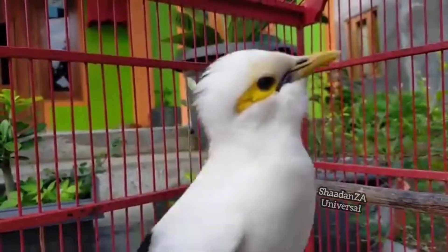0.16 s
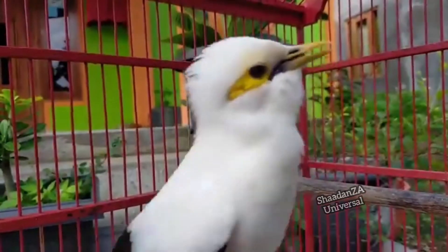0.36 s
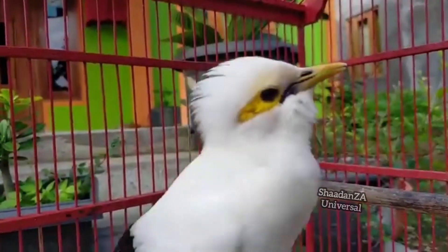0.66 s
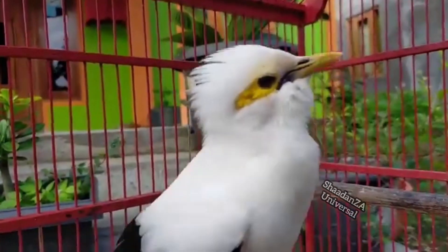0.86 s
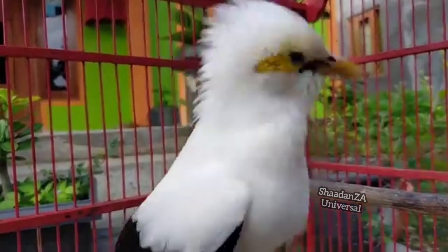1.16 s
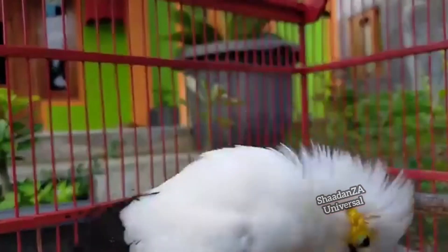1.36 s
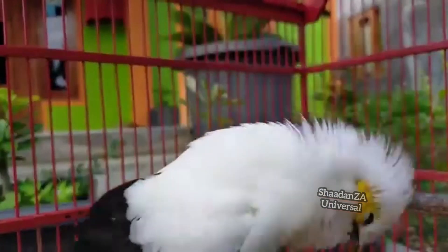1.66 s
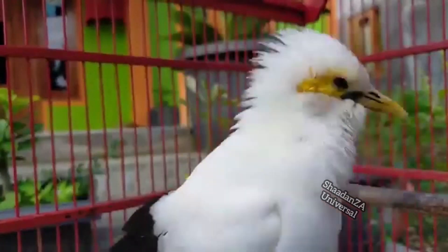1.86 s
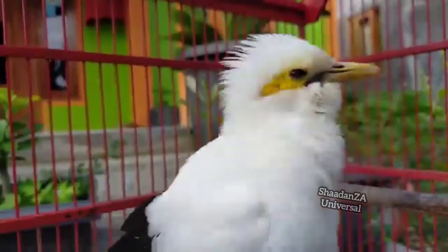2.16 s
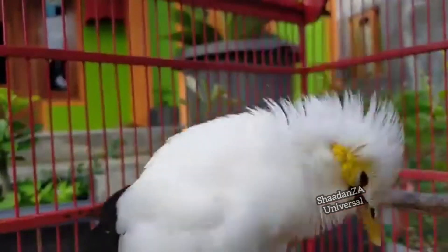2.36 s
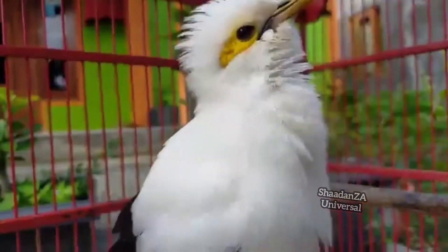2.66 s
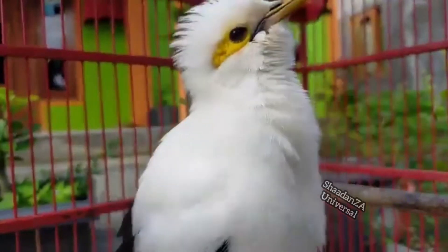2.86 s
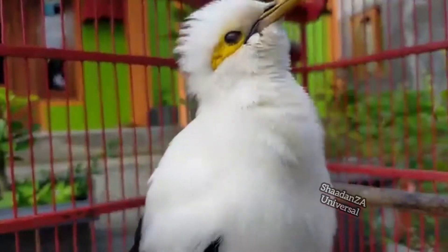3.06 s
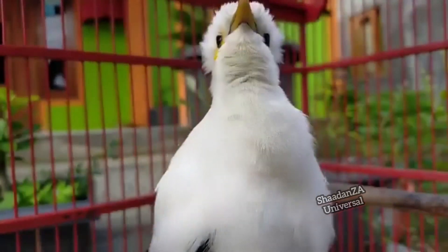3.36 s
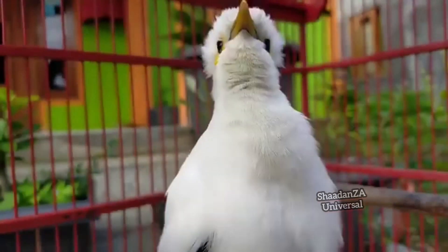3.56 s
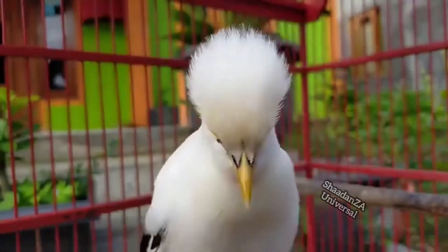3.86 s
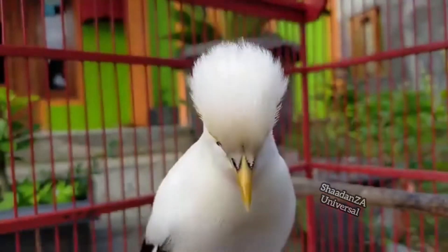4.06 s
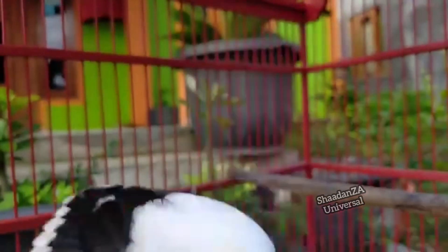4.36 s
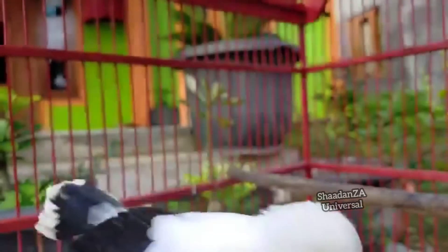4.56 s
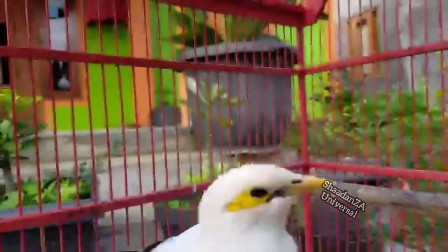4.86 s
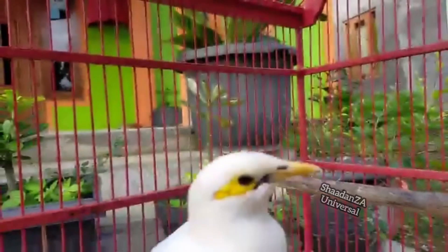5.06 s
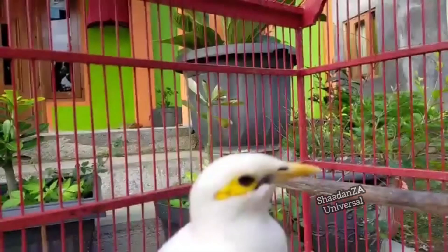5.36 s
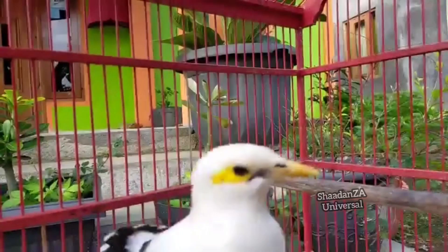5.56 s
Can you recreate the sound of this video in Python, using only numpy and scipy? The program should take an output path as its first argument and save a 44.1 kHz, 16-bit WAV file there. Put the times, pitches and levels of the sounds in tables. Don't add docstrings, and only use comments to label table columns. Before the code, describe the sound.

Very close and nearly dry, a caged bird whistles a level note and a falling one, knocks its wooden perch, then rasps four times with small snaps and four times louder. Farther off another bird chirps in two runs, blurred by yard walls. A motorbike approaches throughout, ending loudest under a soft rising whistle. Light wind buffets the phone microphone.

```python
import sys
import numpy as np
from scipy import signal
from scipy.fft import rfft, irfft, next_fast_len
from scipy.io import wavfile
from scipy.ndimage import map_coordinates

SR = 44100
rng = np.random.default_rng(int(sys.argv[2]) if len(sys.argv) > 2 else 0)


def to_wav(sig):
    pcm = np.clip(np.atleast_2d(sig), -1, 1) * 32767
    pcm = np.round(pcm).astype(np.int16)
    wavfile.write(sys.argv[1], SR, pcm.T)


def gain_from_decibels(decibels):
    exponent = np.asarray(decibels, float) / 20
    return 10 ** exponent


N = 251370
TIME = np.arange(N) / SR

# time_s, pitch_hz, level_db, octave_db (overtone from the open beak)
WHISTLES = [
    [(0.0, 1957, -18.5, -58), (0.032, 1929, -15.5, -46.5), (0.076, 1967, -18, -55.5),
     (0.102, 1934, -14.5, -47.5), (0.156, 1915, -22.5, -55), (0.17, 1970, -53.5, -81)],
    [(0.375, 2007, -46.5, -79), (0.391, 2018, -19, -57), (0.435, 2008, -16.5, -52),
     (0.481, 1981, -14.5, -56), (0.51, 1893, -26, -62), (0.53, 1850, -21, -60), (0.598, 1523, -19.5, -60),
     (0.614, 1540, -23.5, -69), (0.64, 1545, -60, -72)],
    [(4.83, 2086, -67, -78), (4.882, 2065, -36.5, -79), (5.022, 1945, -25, -69), (5.116, 1976, -24.5, -64),
     (5.25, 1940, -25, -65), (5.304, 1990, -23.5, -74), (5.348, 2090, -20, -61), (5.36, 2153, -26, -75),
     (5.372, 2160, -28, -70)],
    [(5.378, 2170, -38, -61), (5.388, 2260, -20.5, -60), (5.408, 2290, -27, -65), (5.422, 2310, -48, -70)],
]
# time_s, peak_db, upper_tone_db (over the lower)
CATCH = [
    (0.155, -28, 10),
]

# time_s, firing_hz, nearness_db, favour_db (lane echo, fifth order over sixth)
BIKE = [(0.0, 22.4, -0.5, -6), (0.6, 23, 1.5, -13.5), (1.2, 23.1, 2, -26), (1.48, 23.5, 3, 0),
        (1.67, 23.6, 2.5, -15), (2.08, 23.9, 3, 0.5), (2.4, 23.7, 4, 5), (2.9, 24, 5.5, 5),
        (3.27, 24.7, 8, -4), (3.37, 24.7, 9, 12), (3.6, 24.4, 9.5, -4.5), (3.84, 25.1, 10, 28),
        (4.2, 24.9, 10.5, 42), (4.38, 24.9, 11, -11), (4.85, 24.9, 12.5, -34), (5.0, 25.8, 14, 3),
        (5.42, 25.2, 14, 9), (5.7, 26.2, 20, 6)]
# multiple, level_db (under the exhaust)
OTHER_ORDERS = [(2, -41), (4, -22), (7, -18), (8, -18.5), (9, -16.5)]
# time_s, level_db
CANCELS = [(1.89, -21), (2.84, -25), (3.401, -13), (3.9, -1.5), (4.28, -32), (5.16, -35)]
# frequency_hz, density_db (per Hz)
EXHAUST = [(35, -25), (60, -20.5), (91, 0.5), (134, 5), (236, -0.5), (297, -12.5), (330, -14.5), (430, -37),
           (730, -120)]
ROAR = [(250, -8.5), (310, -7.5), (370, 2), (460, -3.5), (540, -13), (660, -13.5), (980, -10.5),
        (1180, -13.5), (1450, -12), (2030, -14.5), (2620, -13.5), (3300, -21), (4000, -28.5), (5200, -59.5)]
TYRE_HISS = [(2060, -6), (3500, -3.5), (4200, -5), (5730, -6), (6400, -7.5), (7570, -2.5), (9530, -14),
             (11000, -8.5), (14300, -40), (22000, -120)]
WHIZZ = [(6180, -50), (10500, -35), (11600, -12), (13100, -3), (14600, -0.5), (15400, 1)]
TOWN = [(400, -40), (520, -2), (640, -1), (1000, -7.5), (1600, -30)]

# time_s, peak_db, half_length_s
GUSTS = [(0.084, -35, 0.11), (0.258, -31, .05), (0.68, -38, 0.054), (2.016, -53, 0.043), (2.32, -38, 0.079),
         (2.502, -41, 0.05), (2.85, -51, 0.24), (4.282, -35, 0.049), (4.433, -30, 0.16),
         (4.745, -28, 0.066), (4.926, -19, 0.041), (5.21, -26.5, 0.15), (5.57, -35, 0.032)]
# frequency_hz, density_db (per Hz)
BUFFET = [(8.8, -33.5), (15, -6.5), (38, 1.5), (80, -3.5), (100, -31.5), (180, -120)]

# time_s, peak_db
SNAPS = [(0.659, -39.5), (1.4072, -28), (1.4654, -41.5), (1.7377, -22), (2.0606, -20.5), (2.3947, -23),
         (4.538, -27)]
# time_s, peak_db
KNOCKS = [
    (1.408, -19.5),
    (1.424, -25),
]
# frequency_hz, level_db, t60_s
PERCH = [(400, -22, 0.072), (770, 9.5, 0.028), (1025, 1.5, 0.041), (1610, 3, 0.011)]
# frequency_hz, density_db (per Hz)
BLOW = [(300, -19), (500, 4.5), (1200, -7), (2800, -20), (4000, -33.5)]

# start_s, held_s, top_hz, level_db
CHIRPS = [(0.668, 0.021, 2902, -31), (0.763, 0.023, 3000, -28.5), (0.858, .025, 2890, -27),
          (0.964, .021, 2820, -25), (1.064, 0.02, 2764, -27.5), (1.174, 0.011, 2726, -27.5),
          (1.263, 0.022, 2660, -26), (1.367, .021, 2623, -26.5), (3.519, 0.021, 3115, -31.5),
          (3.624, 0.017, 2780, -33), (3.861, .024, 2757, -29), (3.952, 0.024, 2755, -28),
          (4.051, 0.019, 2824, -26), (4.15, 0.016, 2767, -24), (4.255, 0.019, 2680, -26.5),
          (4.349, 0.016, 2690, -24)]
# time_s, pitch_hz, level_db
LINGER = [(3.535, 3100, -47), (3.56, 3090, -41), (3.585, 3080, -45), (3.602, 3090, -42), (3.615, 3080, -52)]

# start_s, peak_s, end_s, peak_db, hiss_db (over the voice at its peak)
BOWED = [(1.463, 1.47, 1.532, -35, -20.5), (1.736, 1.802, 1.873, -21, -11), (2.057, 2.13, 2.189, -20, -13),
         (2.393, 2.465, 2.538, -20.5, -9)]
UPRIGHT = [(2.707, 2.768, 2.812, -17.5, -13.5), (2.842, 2.912, 2.964, -16, -7.5),
           (3.187, 3.262, 3.319, -16.5, -11), (3.347, 3.407, 3.474, -18.5, -6.5)]
BOWED_SHAPE = dict(attack=.003, start_db=-5, swell_db=3.2, held=.2, sag_db=3, end_db=-27)
UPRIGHT_SHAPE = dict(attack=.012, start_db=-17, swell_db=3.5, held=.58, sag_db=4, end_db=-24)
# frequency_hz, width_hz, level_db
BOWED_THROAT = [(326, 35, -1), (676, 94, 6), (984, 304, -1.5), (1408, 119, 5), (1960, 690, -9.5),
                (2815, 250, -8)]
UPRIGHT_THROAT = [(613, 81, -3.5), (880, 286, -5.5), (1415, 390, -1), (1960, 850, -5.5), (2480, 370, -2),
                  (3380, 990, -36)]
# frequency_hz, density_db (per Hz)
BOWED_HISS = [(1940, -43), (3300, -14), (4250, -14), (4910, -30), (7150, 3), (9210, -3.5), (11100, -19.5),
              (12700, -21), (14300, 4.5), (15600, -3.5)]
UPRIGHT_HISS = [(1940, -27), (3300, 2), (3960, -2), (4280, -6.5), (7250, -5), (7730, -9), (8250, -23),
                (9770, -23.5), (11600, -16), (11900, -10), (12600, -3), (14900, -1.5), (15600, -11)]
# time_s, peak_db, upper_tone_db (over the lower)
BOWED_SURGES = [(1.773, -17, -4), (1.793, -12, -3), (1.815, -23, -3), (2.095, -10, 1), (2.117, -24, 0),
                (2.135, -18, -14), (2.427, -17, 2), (2.447, -18.5, 12.5)]
UPRIGHT_SURGES = [(2.7469, -4.5, -22), (2.7647, -5, -20), (2.774, -10, -25), (2.8814, -17.5, 14),
                  (2.8937, -5, 3), (2.907, -9, 4), (2.9145, 1, -1.5), (3.2246, -7, -17), (3.247, 0, -4),
                  (3.265, -1, -19), (3.383, -9, 13), (3.3944, -15, 12.5), (3.403, -7, -8.5),
                  (3.417, -10, 15), (3.4244, -19.5, 4)]
# lower_hz, upper_hz
SURGE_HZ = [(750, 1466), (1330, 2420), (1660, 2080)]


def unit(x):
    return x / np.sqrt(np.mean(x ** 2) + 1e-20)


def curves(rows):
    s, *columns = np.transpose(rows)
    return [np.interp(TIME, s, column) for column in columns]


def during(rows, fade):
    since_start = TIME - rows[0][0] + fade
    until_end = rows[-1][0] + fade - TIME
    return np.clip(np.minimum(since_start, until_end) / fade, 0, 1)


def bump(centre_s, width_s):
    return np.exp(-((TIME - centre_s) / width_s) ** 2)


def wobble(rate):
    return map_coordinates(rng.standard_normal(N // 25), [TIME * rate])


def filtered(x, response):
    m = next_fast_len(N + SR // 2)
    return irfft(rfft(x, m) * response(np.fft.rfftfreq(m, 1 / SR)), m)[:N]


def coloured(x, spectrum):
    f, level = np.transpose(spectrum)
    return unit(filtered(x, lambda hz: gain_from_decibels(np.interp(np.log(hz + 1), np.log(f + 1), level))))


def noise():
    return rng.standard_normal(N)


def tone_at(hz):
    return np.sin(2 * np.pi * np.cumsum(hz) / SR)


def add_at(out, s, sound):
    out[round(s * SR):][:len(sound)] += sound


def whistles():
    out = np.zeros(N)
    for rows in WHISTLES:
        hz, db, octave_db = curves(rows)
        fourth_db = octave_db - 5.5 + 1.9 * np.maximum(octave_db + 54, 0)
        turn = 2 * np.pi * np.cumsum(hz * (1 + 0.00073 * wobble(60))) / SR
        beak = np.clip((hz - 1800) / 150, 0, 1)
        tone = gain_from_decibels(db + 0.8 * wobble(70)) * np.sin(turn) + beak * gain_from_decibels(fourth_db) * np.sin(4 * turn)
        tone *= 1 + 0.015 * wobble(1400)
        third_seventh = gain_from_decibels(-5) * np.sin(3 * turn) + gain_from_decibels(-12) * np.sin(7 * turn)
        tone += gain_from_decibels(octave_db) * (np.sin(2 * turn) + beak * third_seventh)
        out += np.sqrt(2) * tone * during(rows, fade=0.0036)
    return out


def motorbike():
    firing_hz, near_db, favour_db = curves(BIKE)
    exhaust_db, roar_db = -33 + 0.9 * near_db, -52.5 + near_db
    swish_db = 4.5 * bump(5.52, 0.18)
    closest_db = np.minimum(near_db, 15) + swish_db
    far_hiss_db, tyre_db = -61, -74 + 1.436 * closest_db
    hiss_db = 20 * np.log10(gain_from_decibels(far_hiss_db) + gain_from_decibels(tyre_db))
    whizz_db = -66.5 + 1.24 * closest_db

    fade_db = 0.5 + 0.14 * near_db
    cancel_db = sum(db * bump(s, 0.033) for s, db in CANCELS)
    pair_db = -36.5 + 0.74 * near_db
    fifth_db = cancel_db + 3 + pair_db + np.minimum(favour_db, 0) + fade_db * wobble(7)
    sixth_db = pair_db - np.maximum(favour_db, 0) + fade_db * wobble(7)
    pipe_db = 6 * np.exp(-((10 * firing_hz - 235.8) / 6) ** 2)
    tenth_db = pipe_db - 47 + 0.75 * near_db + fade_db * wobble(7)
    orders = [(5, fifth_db), (6, sixth_db), (10, tenth_db)]
    orders += [(k, exhaust_db + db + 4 * wobble(5)) for k, db in OTHER_ORDERS]
    turn = 2 * np.pi * np.cumsum(firing_hz) / SR
    beat = sum(np.sqrt(2) * gain_from_decibels(db) * np.cos(k * turn + 0.5 * wobble(4)) for k, db in orders)

    puffs = gain_from_decibels(0.7 * np.cos(turn) + 0.84 * np.cos(2 * turn))
    exhaust = gain_from_decibels(exhaust_db - 7) * coloured(puffs * noise(), EXHAUST)
    roar = gain_from_decibels(roar_db + 1 + 0.75 * swish_db) * gain_from_decibels(wobble(8)) * coloured(puffs * noise(), ROAR)
    dull = filtered(roar, lambda hz: 1 / (1 + (hz / 1800) ** 4))
    roar = dull + (roar - dull) * gain_from_decibels(-0.9 * np.clip(roar_db + 44.5, 0, 9))
    hiss = gain_from_decibels(hiss_db + 0.97 * wobble(11)) * coloured(noise() * gain_from_decibels(wobble(200)), TYRE_HISS)
    whizz = gain_from_decibels(whizz_db + 6 + 0.8 * wobble(8.7)) * coloured(noise() * gain_from_decibels(1.5 * wobble(200)), WHIZZ)
    return beat + exhaust + roar + hiss + whizz + gain_from_decibels(-59.5) * coloured(noise(), TOWN)


def wind():
    gusts = sum(gain_from_decibels(db) * bump(s, half_s) for s, db, half_s in GUSTS)
    strength = gain_from_decibels(-46.5 + 2 * wobble(5.9)) + gusts
    return strength * coloured(noise() * gain_from_decibels(2.7 * wobble(12)), BUFFET)


def yard(x, t60, gap):
    t, out, hop = np.arange(SR // 3) / SR, np.zeros(N + SR), SR // 10
    for start in range(0, N, hop):
        tail = rng.standard_normal(len(t)) * gain_from_decibels(-60 * t / t60) * (t > gap)
        piece = signal.fftconvolve(x[start:start + hop], tail / np.linalg.norm(tail))
        out[start:start + len(piece)] += piece
    return out[:N]


def surges():
    out, t = np.zeros(N), np.arange(-300, 300) / SR
    for rows, pair_hz in zip((BOWED_SURGES, UPRIGHT_SURGES, CATCH), SURGE_HZ):
        for s, db, upper_db in rows:
            hz, upper_hz = pair_hz * np.exp(0.045 * rng.standard_normal(2))
            pair = np.sin(2 * np.pi * hz * t) + gain_from_decibels(upper_db) * np.sin(2 * np.pi * upper_hz * t)
            centre = round((s + 0.002) * SR)
            out[centre - 300:centre + 300] += gain_from_decibels(db - 9.5) * pair * np.exp(-(t / 0.0029) ** 2)
    return out


def cage():
    out, t = np.zeros(N + SR), np.arange(SR // 8) / SR
    for s, db in SNAPS:
        click = np.diff(rng.standard_normal(len(t) + 1))
        add_at(out, s, gain_from_decibels(db - 6.5 - 60 * t / 0.011) * click)
    for s, db in KNOCKS:
        ring = coloured(noise(), BLOW)[:len(t)] * gain_from_decibels(-7.5 - 60 * t / 0.12)
        for hz, level, t60 in PERCH:
            ring += gain_from_decibels(level + rng.normal(0, 5.2) - 60 * t / t60) * np.sin(2 * np.pi * hz * t)
        add_at(out, s, gain_from_decibels(db - 2) * ring * (1 - np.exp(-t / 0.00091)))
    return out[:N]


def far_bird():
    plunge_s, rebound_s, end_hz = 0.016, 0.045, 1770
    out = np.zeros(N)
    for s, held, top_hz, db in CHIRPS:
        t = np.arange(int((held + plunge_s + rebound_s) * SR)) / SR
        along = np.minimum(t / held, 1)
        fall = np.clip((t - held) / plunge_s, 0, 1)
        climb = np.clip((t - held - plunge_s) / rebound_s, 0, 1)
        depth = fall ** 0.87 * (1 - 0.85 * climb ** 0.58)
        hz = top_hz * (1 - 0.025 * along ** 2 * (1 - fall)) - (top_hz - end_hz) * depth
        head = np.sin(np.pi * along * 0.64) ** 1.4
        bends_s = [0, 0.59 * plunge_s, plunge_s, plunge_s + rebound_s]
        level_db = np.interp(t - held, bends_s, [0, -5, -15, -17])
        rough = gain_from_decibels(4.2 * fall * wobble(366)[:len(t)])
        add_at(out, s, gain_from_decibels(db + 3 + level_db) * head * rough * (1 - climb ** 4) * tone_at(hz))
    hz, db = curves(LINGER)
    out += gain_from_decibels(db) * during(LINGER, fade=0.004) * tone_at(hz)
    return out * gain_from_decibels(1.6 * wobble(170))


def effort(calls, attack, start_db, swell_db, held, sag_db, end_db):
    early_db, late_db = -15.5, -17.5
    return [[(s, db + start_db, early_db),
             (s + attack, db - swell_db, early_db),
             (peak, db, hiss_db),
             (peak + held * (end - peak), db - sag_db, late_db),
             (end, db + end_db, late_db)]
            for s, peak, end, db, hiss_db in calls]


def rasps(calls, throat, hiss, flaps_hz, low_hz, burst_db, air):
    flap_count = np.floor(np.cumsum(flaps_hz * gain_from_decibels(2.7 * wobble(300))) / SR)
    flaps = unit(np.diff(flap_count, prepend=0) * gain_from_decibels(3.9 * noise()))
    bursts = gain_from_decibels(burst_db * wobble(110))

    def tube(f):
        total = 0
        for k, (centre, width, db) in enumerate(throat):
            damping = 1j * f * width
            total = total + (-1) ** k * gain_from_decibels(db) * damping / (centre ** 2 - f * f + damping)
        return total / (1 + (low_hz / (f + 1)) ** 9) / (1 + (f / 3600) ** 2)

    voice = unit(filtered(bursts * (flaps + air * noise()), tube))
    breath = coloured(bursts * (0.14 * flaps + noise()), hiss)
    out = np.zeros(N)
    for rows in calls:
        db, hiss_db = curves(rows)
        out += gain_from_decibels(db) * (voice + gain_from_decibels(hiss_db) * breath) * during(rows, fade=0.0016)
    return out


def scene():
    song = whistles() + surges() + cage()
    song += rasps(effort(BOWED, **BOWED_SHAPE), BOWED_THROAT, BOWED_HISS,
                  flaps_hz=676, low_hz=273.9, burst_db=1.5, air=0.75)
    song += rasps(effort(UPRIGHT, **UPRIGHT_SHAPE), UPRIGHT_THROAT, UPRIGHT_HISS,
                  flaps_hz=502, low_hz=566, burst_db=2.0, air=0.6)
    far = far_bird()
    scattered = gain_from_decibels(-3) * far + gain_from_decibels(-7.5) * yard(far, t60=0.04, gap=0.001)
    echoes = gain_from_decibels(-22.5) * yard(song, t60=0.29, gap=0.016) + gain_from_decibels(-8) * yard(far, t60=0.31, gap=0.008)
    return (song + scattered + echoes + motorbike() + wind())[None]


def low_pass(x):
    return signal.sosfilt(signal.butter(12, 16690, fs=SR, output="sos"), x)


def record(dry):
    soft = dry[0] / (1 + np.abs(dry[0] / 0.9) ** 4) ** (1 / 4)
    mix = filtered(soft, lambda hz: gain_from_decibels(-32 * (hz > 15480)))[None]
    return low_pass(mix)


dry = scene()
out = record(dry)
to_wav(out)
```